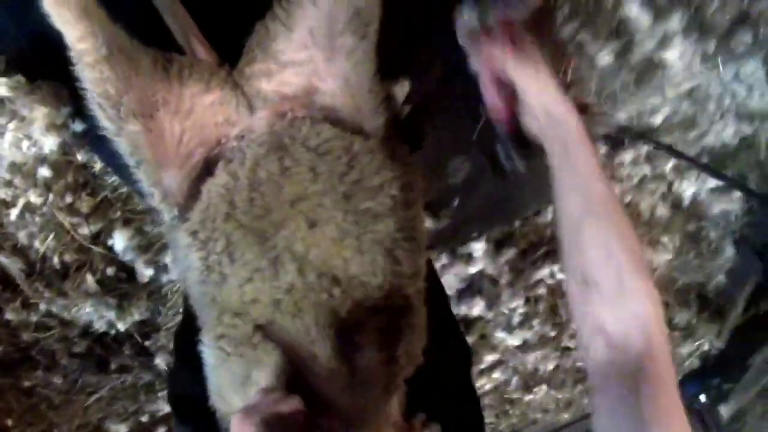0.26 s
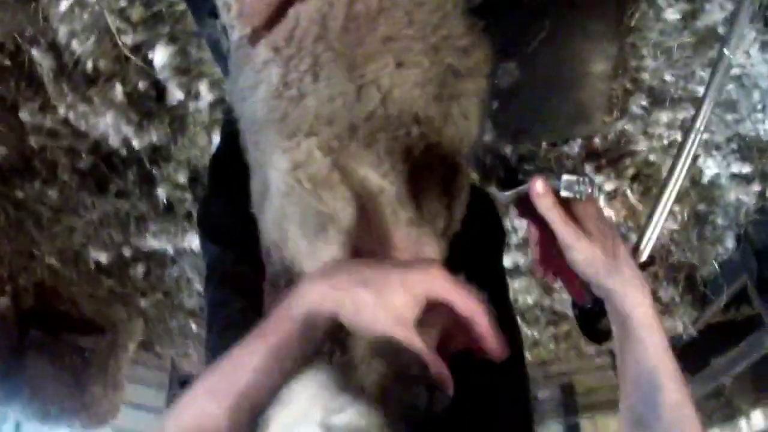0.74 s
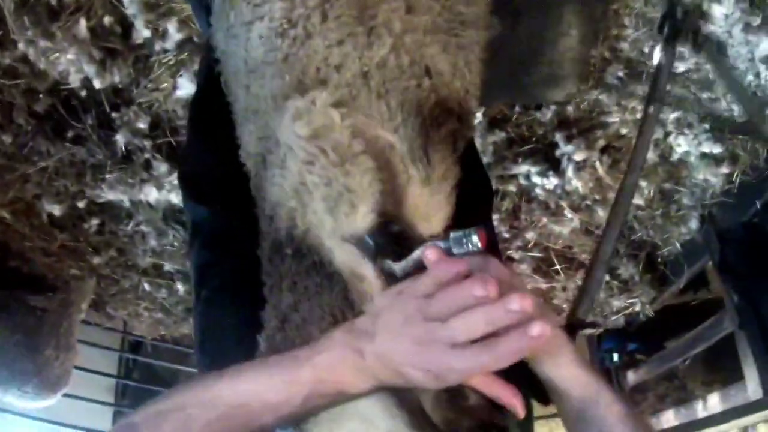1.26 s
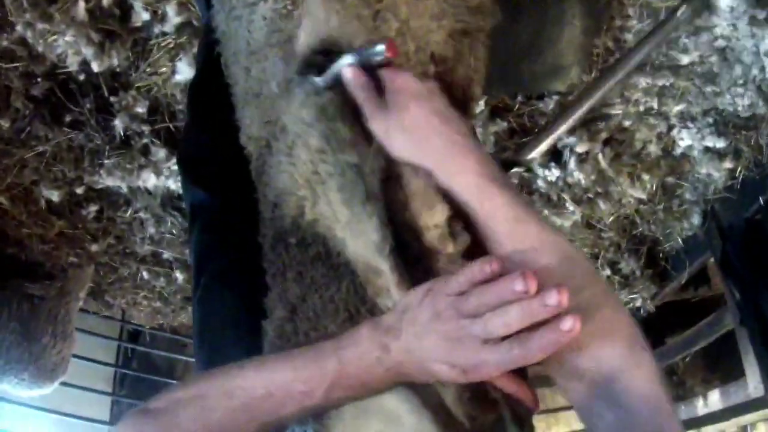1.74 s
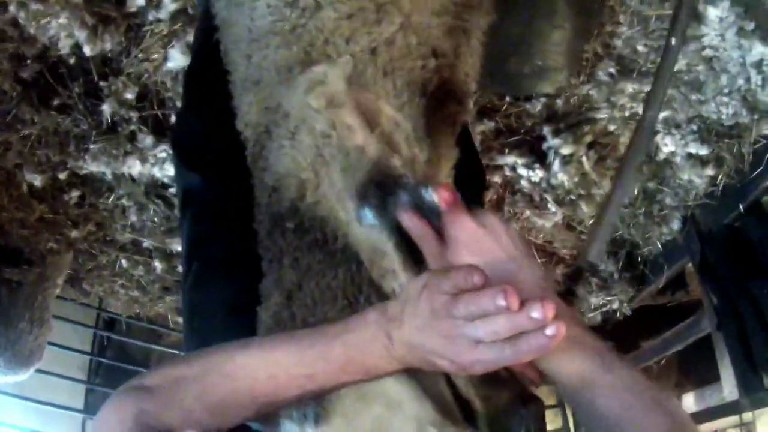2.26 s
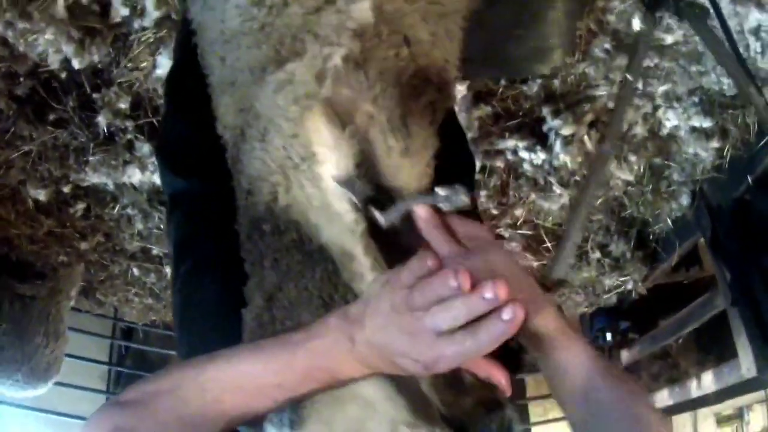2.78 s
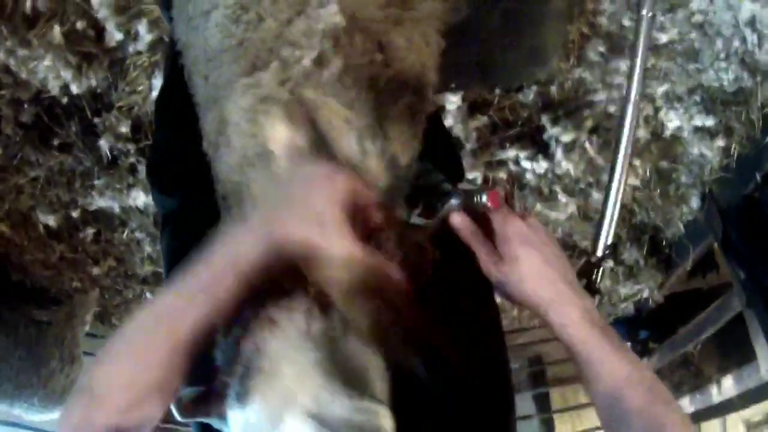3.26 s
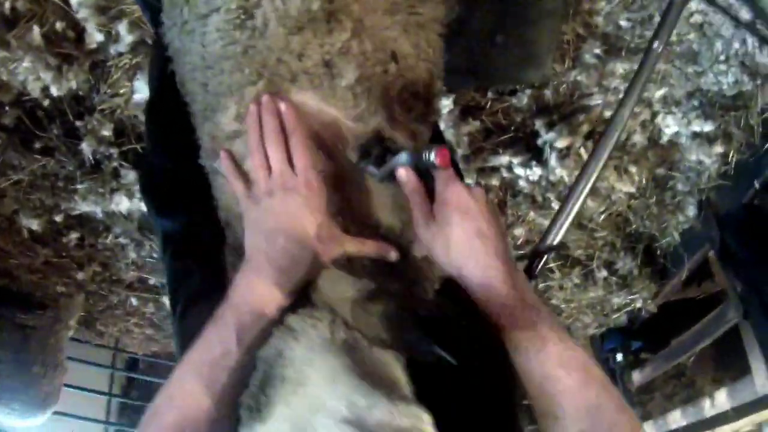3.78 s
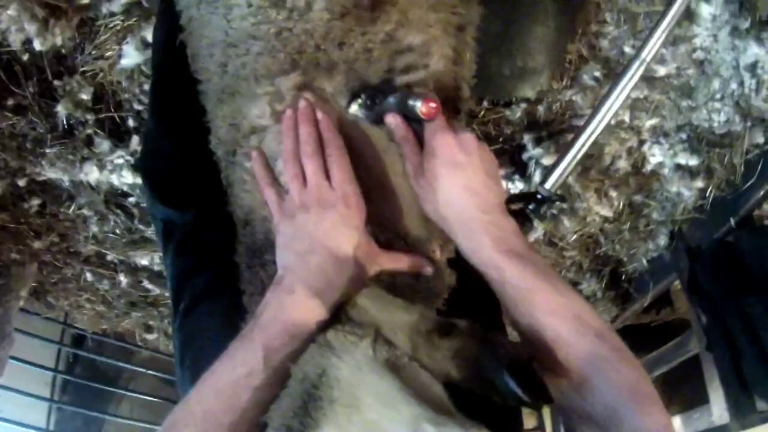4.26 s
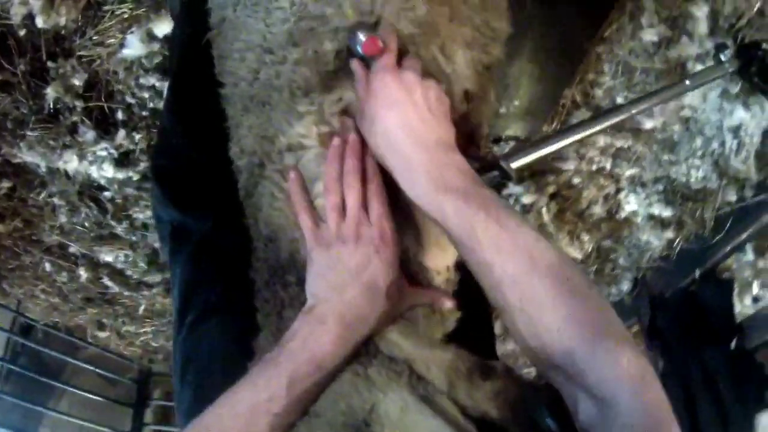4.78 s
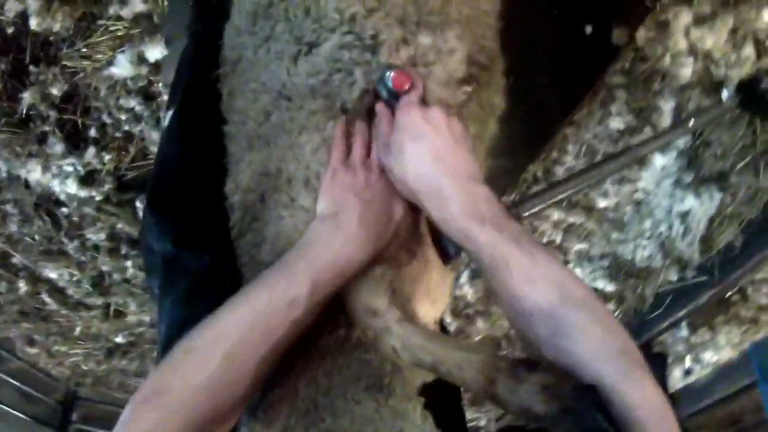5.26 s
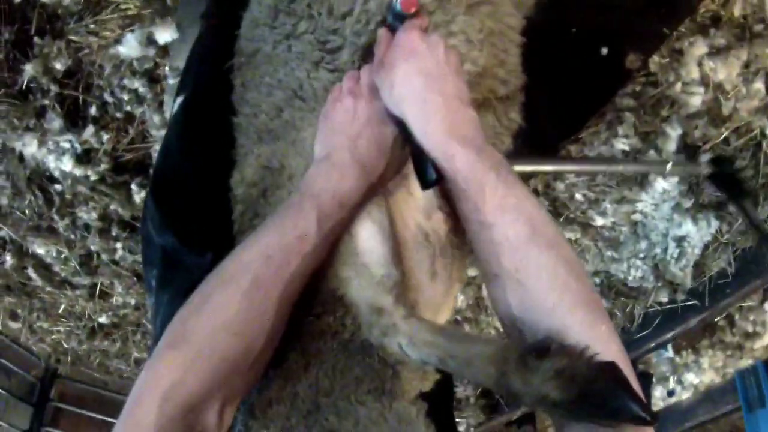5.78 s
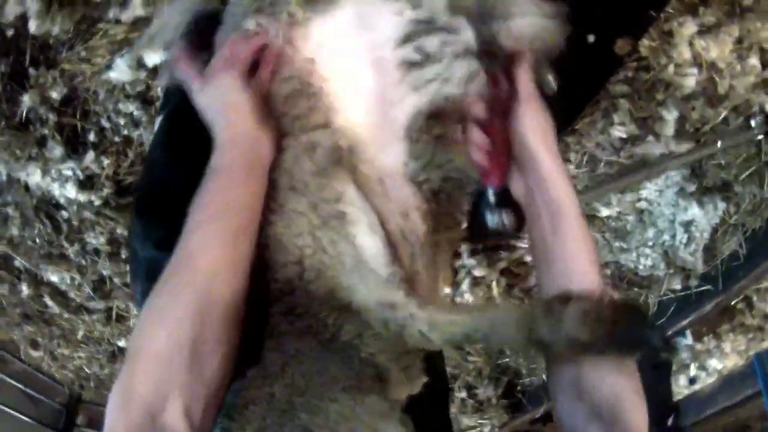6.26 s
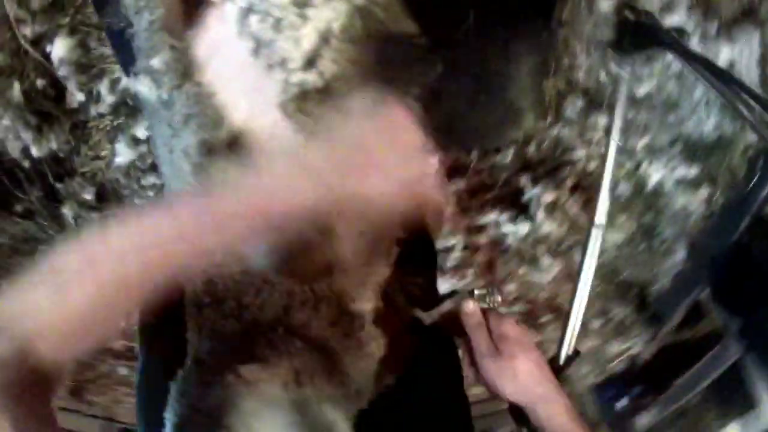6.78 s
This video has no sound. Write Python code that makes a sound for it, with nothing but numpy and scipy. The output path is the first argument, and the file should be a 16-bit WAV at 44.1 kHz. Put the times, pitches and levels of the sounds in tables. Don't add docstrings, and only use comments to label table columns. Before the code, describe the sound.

Close, steady metallic buzz of sheep-shearing clippers, ringing and scraping as the hand changes pressure, with a faint motor whine and soft microphone thuds.

```python
import sys
import numpy as np
from scipy import signal
from scipy.fft import rfft, irfft, next_fast_len
from scipy.io import wavfile
from scipy.ndimage import uniform_filter1d, map_coordinates

SR = 44100
rng = np.random.default_rng(int(sys.argv[2]) if len(sys.argv) > 2 else 0)


def wrap_up_sound(samples):
    columns = np.atleast_2d(samples).T
    tamed = np.clip(columns, -1, 1)
    steps = np.round(tamed * 32767).astype(np.int16)
    wavfile.write(sys.argv[1], SR, steps)


def gain_from_db(level_db):
    decades = np.asarray(level_db, float) / 20
    return 10 ** decades


N = 310023
T = np.arange(N) / SR


def evened(x):
    return x / np.sqrt(np.mean(x ** 2) + 1e-20)


def curves(rows):
    s, *columns = np.transpose(rows)
    return [np.interp(T, s, c) for c in columns]


def coloured(x, shape, lo_hz=0, hi_hz=SR, soft=0.058):
    size = next_fast_len(N)
    hz = np.fft.rfftfreq(size, 1 / SR) + 0.099
    f, db = np.transpose(shape)
    tint = gain_from_db(np.interp(np.log(hz), np.log(f), db))
    above_low = 1 + np.tanh((hz - lo_hz) / (soft * hz))
    below_high = 1 + np.tanh((hi_hz - hz) / (soft * hz))
    return evened(irfft(rfft(x, size) * tint * np.sqrt(above_low * below_high), size)[:N])


def wander(hz):
    noise = uniform_filter1d(rng.standard_normal(N), int(SR / hz / 4) + 1)
    return evened(signal.lfilter([1], [1, -np.exp(-2 * np.pi * hz / SR)], noise))


def held(start, length, swell_s=.13):
    to_edge = np.minimum(T - start, start + length - T)
    return np.sin(np.pi / 2 * np.clip(to_edge / swell_s, 0, 1)) ** 2


def resonate(x, hz, width):
    turn = np.exp(2j * np.pi * np.cumsum(hz * np.ones(len(x))) / SR)
    r = np.exp(-np.pi * width / SR)
    return evened((turn * signal.lfilter([1], [1, -2 * r, r * r], x / turn)).real)


def swing(turns, sharp, back_db, rest):
    bend = np.cos(2 * np.pi * turns)
    return rest + np.exp(sharp * (bend - 1)) + gain_from_db(back_db) * np.exp(-sharp * (bend + 1))


def knocks(turns, hold_s=.32, size=760):
    step = T / hold_s
    k = step.astype(int)
    part = np.sin(np.pi / 2 * (step % 1))
    patterns = rng.standard_normal((k.max() + 2, size))
    place = (turns % 1) * (size - 1)
    this = map_coordinates(patterns, [k, place], order=1)
    after = map_coordinates(patterns, [k + 1, place], order=1)
    return evened(np.sqrt(1 - part ** 2) * this + part * after)


def scrape(turns, sharp, back_db, rest, uneven_db):
    stroke = (2 * turns + .5).astype(int)
    hardness = uniform_filter1d(rng.standard_normal(stroke.max() + 1)[stroke], 40)
    effort = swing(turns, sharp, back_db, rest) * gain_from_db(uneven_db * hardness)
    return evened(effort * rng.standard_normal(N))


# time in seconds, turns a second.
SHAFT = [(0.0, 58.4), (0.2, 58.38), (0.4, 57.84), (1.0, 57.6), (1.6, 58.18), (1.9, 57.56), (2.2, 57.98),
         (2.6, 57.98), (2.8, 58.26), (3.2, 57.7), (3.6, 58.02), (4.1, 57.53), (4.8, 57.94), (5.2, 57.66),
         (5.8, 58.28), (6.4, 58.26), (6.65, 57.84), (7.03, 57.76)]


def handpiece():
    turns = np.cumsum(curves(SHAFT)[0] + .1 * wander(6)) / SR
    rattle = knocks(turns)
    knock = evened(rattle * swing(turns, 2.5, -2, .9))
    taps = evened(rattle * swing(turns, 6.0, -1.5, .4))
    ticks = scrape(turns, 11, -3, 4, .8)
    snaps = evened((rattle + .6 * ticks) * swing(turns, 5, -8, .4))
    rings = list(zip(*hand_on_rings(turns)))
    steel = head(turns, rattle, rings[:4]) + blades(turns, rattle, ticks, rings[4:])
    return steel + glints(0.08 * taps + snaps) + shaft_orders(turns) + tube_hum(knock)


# time in seconds, push into the wool, turn of the comb towards
HAND = [(0.0, -0.2, 0.34, -1), (0.24, 0, 1.1, -0.4), (0.72, 0.2, 0.61, 0), (1.08, -1.03, -0.14, -0.3),
        (1.76, 1, 0.059, -0.5), (2.24, -0.35, 0.58, -0.3), (2.44, -0.74, 0.3, -0.6), (2.9, 1.44, 0.34, -1),
        (3.2, -1.75, 1.75, 0.1), (3.8, 1.26, 0.63, -1.5), (4.32, 1.5, -1.4, -2), (4.68, 0, -1.6, 0.5),
        (4.96, 0.3, -0.64, -0.4), (5.52, 1, -1.5, -1.5), (5.84, 0, -0.5, 0.9), (6.16, -0.8, -0.064, -0.1),
        (6.72, 1, 1.5, -2.5), (7.03, 2, -0.3, -2.5)]
# usual level in dB, dB per push, dB per turn, dB per roll.
RINGS = [
    (-56, 0.74, -0.4, 1.06),
    (-51.5, 1.38, 1.4, 1.5),
    (-60, 1, 2, 1),
    (-57, 1.16, 0.64, 0.5),
    (-59, 1.5, 1.06, 0.37),
    (-58.5, 2, -0.3, 0.36),
    (-57, 0.5, 0.6, 0),
    (-63.5, 1, 0.85, 0.54),
]
RINGS_HZ = [1575, 2350, 3145, 3840, 4790, 5610, 6680, 10000]
# start in seconds, length in seconds, rise in Hz.
LOOSE = [(2.558, 0.58, 220), (3.493, .65, 172), (6.132, 1, 210)]
# lag in turns, sharpness (no unit), return stroke in dB,
# steady share (no unit).
STRIKES = [(.1, 5, -1, 1.8), (.03, 6, 0, 1.3), (-.03, 2.5, -20, 1.1), (0, 2.5, -20, 1.7), (0, 6, -3, 2.3),
           (.12, 7, -8, 2.4), (.07, 9, -16, 2), (.04, 16, -4, 1.3)]


def hand_on_rings(turns):
    push, turn, roll = curves(HAND)
    levels_db = [db + a * push + b * turn + c * roll + 0.5 * wander(2.6) for db, a, b, c in RINGS]
    rings_hz = [hz * (1 + 0.0095 * wander(7.2)) for hz in RINGS_HZ]
    rings_hz[1] = rings_hz[1] + sum(rise_hz * held(s, length) for s, length, rise_hz in LOOSE)
    drift_turns = .045
    strikes = [swing(turns - lag + drift_turns * wander(1.5), *shape) for lag, *shape in STRIKES]
    return levels_db, rings_hz, strikes


def ringing_band(knock, taps, rub, knock_share, ring, shape, lo_hz, hi_hz, bed):
    level_db, ring_hz, strike = ring
    bed_db, width_hz = bed
    drive = evened(strike * (np.sqrt(knock_share) * knock + np.sqrt(1 - knock_share) * rub))
    bed_level = np.minimum(gain_from_db(level_db), gain_from_db(bed_db))
    ring_level = np.sqrt(gain_from_db(level_db) ** 2 - bed_level ** 2)
    ringing = resonate(1.6 * drive + evened(strike * taps), ring_hz, width_hz)
    return bed_level * coloured(drive, shape, lo_hz, hi_hz, 0.011) + ring_level * ringing


# frequency in Hz, level in dB per Hz.
HEAD_SHAPE = [(740, -72), (1250, -18), (1320, -11.5), (1450, -2), (1500, 0), (1670, -4), (1820, -9),
              (2070, 0), (2350, 1), (2900, -4.5), (3140, 0.5), (3390, -6), (3660, 1), (4040, -7),
              (4300, -6.5), (5590, -20), (9460, -120)]
HEAD_EDGES_HZ = [1000, 1850, 2930, 3420, 4350]
# level of the wide bed in dB, width of the ring in Hz.
HEAD_BEDS = [(-57, 500), (-53, 670), (-61, 450), (-58, 2100)]


def head(turns, rattle, rings):
    strokes = scrape(turns, 4, -1, 3, .3)
    taps = 0.71 * rattle + 0.67 * strokes
    out = np.zeros(N)
    for i, knock_share in enumerate([0.28, 0.25, 0.21, 0.18]):
        rub = scrape(turns + 0.13 * rng.standard_normal(), 0.64, 0.0, 4, 0.34)
        out += ringing_band(rattle, taps, rub, knock_share, rings[i], HEAD_SHAPE,
                            HEAD_EDGES_HZ[i], HEAD_EDGES_HZ[i + 1], HEAD_BEDS[i])
    return out


# frequency in Hz, level in dB per Hz.
BLADE_SHAPE = [(2530, -39), (4300, -10.5), (4790, -8.5), (5160, -7.5), (5450, 1.5), (5800, -0.5),
               (6230, -8), (6820, -4), (7400, -8), (7850, -5.5), (8300, -15), (8870, -15.5), (11400, -19.5),
               (12300, -22.5), (15800, -26)]
BLADE_EDGES_HZ = [4350, 5170, 6150, 8350, 17000]
# level of the wide bed in dB, width of the ring in Hz.
BLADE_BEDS = [(-59, 940), (-58, 1040), (-57, 2700), (-58, 3000)]


def blades(turns, rattle, ticks, rings):
    hiss = scrape(turns + .07 * wander(30), 3.0, -5, 5, 1.4)
    out = np.zeros(N)
    for i, knock_share in enumerate([0.15, 0.17, 0.24, 0.37]):
        out += ringing_band(rattle, ticks, hiss, knock_share, rings[i], BLADE_SHAPE,
                            BLADE_EDGES_HZ[i], BLADE_EDGES_HZ[i + 1], BLADE_BEDS[i])
    return out


# start in seconds, length in seconds, pitch in Hz, level in dB.
GLINTS = [(0.13, 0.15, 2350, -48), (0.42, 0.11, 2380, -51), (0.072, 0.47, 6900, -57.5),
          (0.52, 0.36, 3160, -52.5), (0.57, 0.25, 3540, -54), (.56, .3, 3750, -59), (.55, 0.36, 6100, -64),
          (1.15, 0.37, 3580, -60), (1.66, 0.36, 1650, -63), (2.85, 0.3, 4900, -57),
          (3.02, 0.3, 4820, -56.5), (5.95, .35, 1560, -57), (2.84, .3, 3050, -58), (4.1, .7, 9500, -76),
          (4.1, .7, 13500, -81), (5.25, .42, 5600, -65), (5.7, 0.34, 4800, -61), (1.42, 0.19, 4800, -61),
          (2.4, .2, 5350, -59), (0.6, .2, 3900, -59), (.58, 0.22, 4900, -60), (3.2, 0.34, 2840, -55.5),
          (3.5, 0.27, 7600, -61), (4.05, 0.31, 3500, -58), (4.2, .25, 3280, -56), (4.33, 0.27, 3060, -58),
          (3.516, 0.48, 2390, -55), (4.1, 0.57, 5800, -66), (4.45, 0.46, 5500, -62), (5.4, 0.17, 7540, -62),
          (5.1, .35, 6790, -66), (6.2, 0.29, 6540, -63), (1.4, .5, 7770, -70), (2.75, 0.44, 7900, -63),
          (5.3, 0.64, 4750, -71), (4.423, .16, 1591, -50), (.58, .25, 4400, -58), (.8, 0.27, 5700, -72),
          (1.45, .4, 6700, -65), (2.8, 0.41, 2240, -60), (3.603, .4, 6600, -63), (5.4, 0.18, 3000, -57),
          (6.7, 0.4, 8200, -66), (.6, 0.19, 2600, -55), (2, 0.42, 6000, -68), (1.95, .3, 3330, -61),
          (6.2, 0.19, 2340, -60), (6.618, 0.18, 2400, -52.5), (0.846, 0.2, 2280, -52.5),
          (4.854, 0.31, 2300, -52.5), (4.95, 0.37, 3300, -63), (5.2, 0.46, 5100, -64),
          (5.8, 0.15, 7670, -56.5), (6.5, 0.26, 1470, -59)]


def glints(taps):
    longest_swell_s, width_share = 0.16, 0.085
    out = np.zeros(N)
    for s, length, hz, db in GLINTS:
        span = slice(max(round(s * SR), 0), round((s + length) * SR))
        swell = held(s, length, min(length / 2, longest_swell_s))[span]
        out[span] += gain_from_db(db) * swell * resonate(taps[span], hz, width_share * hz)
    return out


# start in seconds, length in seconds, order, dB above rest.
SINGS = [(0.46, 0.58, 1, 7.5), (2.18, 0.61, 1, 5.5), (3.103, 0.47, 1, 10.5), (4.6, 0.32, 1, 6),
         (1.46, 0.27, 1, 9), (5.95, 0.35, 1, 4), (1.16, 1.05, 12, 6.5), (3, 0.76, 12, 5),
         (4.02, 0.74, 12, 12), (4.7, 0.91, 12, 9), (5.784, 0.57, 12, 12), (3.55, 0.46, 14, 13.5),
         (3.93, 0.28, 14, 14), (4.12, .33, 14, 13), (4.4, .36, 14, 10), (3.75, 0.37, 13, 11),
         (4.55, .5, 13, 6), (3.95, .6, 17, 8), (0.087, .45, 13, 6), (4.4, 0.27, 14, 5), (6.1, 0.35, 14, 8),
         (0.14, 0.68, 26, 8.5), (0.96, 1.33, 26, 9.5), (2.7, 0.26, 26, 9), (3.7, 0.38, 26, 8),
         (4.65, 1.18, 26, 12.5), (6.353, 0.42, 26, 9), (4.05, 0.52, 19, 13), (4.85, 0.74, 19, 13),
         (2.55, 0.47, 24, 13), (3.9, 1.04, 24, 10), (5.1, 0.77, 24, 11), (1.12, 0.87, 25, 6),
         (3.62, 0.36, 25, 12), (3.95, 0.34, 25, 12), (4.65, 0.4, 25, 9), (5.1, 0.52, 25, 12),
         (4.4, 1.8, 27, 12), (0.58, 1.53, 28, 6.5), (4.28, 0.29, 28, 12), (4.6, .6, 28, 6),
         (5.55, 0.33, 28, 9), (1.3, 0.57, 29, 10.5), (5, 0.6, 29, 12), (6.5, .3, 29, 10),
         (0.41, 0.21, 37, 6), (1.13, 1.5, 37, 9), (2.8, .75, 37, 10), (3.95, 1.76, 37, 8), (.2, 2, 39, 0.5),
         (2.8, .8, 39, 7), (3.8, 0.99, 39, 3), (0.13, 1.3, 41, -1), (3.8, .6, 41, 5), (4.95, 0.91, 41, 9),
         (6.55, 0.5, 41, 12.5), (0.14, 0.51, 42, 7), (1.3, 0.63, 42, 9.5), (2.4, 0.65, 42, 14),
         (3.35, 0.61, 42, 11), (2.4, .6, 43, 9), (3.55, 0.64, 43, 18.5), (5, 1.4, 43, 6),
         (6.2, 0.45, 43, 4), (1.6, 0.36, 46, 14), (2.56, 0.46, 46, 11), (3.66, 0.47, 46, 18),
         (6.35, 0.78, 46, 14.5)]


def sung(k):
    lifts = [up_db * held(s, length) for s, length, order, up_db in SINGS if order == k]
    return np.max([0 * T] + lifts, axis=0)


# order, level in dB.
ORDERS = [(1, -70.5), (12, -76), (14, -81), (26, -68), (19, -89), (24, -74), (25, -70), (27, -77),
          (28, -67.5), (29, -70), (37, -68.5), (39, -67), (41, -70), (42, -69), (43, -74), (46, -76)]
# order, dB relative to it.
SIDE_ORDERS = [(11, -13), (13, -6), (15, -12.5), (16, -13), (17, -10), (20, -21), (21, -12)]


def shaft_orders(turns):
    levels = [(k, db + sung(k)) for k, db in ORDERS]
    order_12_db = levels[1][1]
    for k, db in SIDE_ORDERS:
        levels.append((k, 0.59 * order_12_db - 34.5 + db + 2.8 * wander(1.2) + sung(k)))
    flutter_db, slack, lock_turns = 1.8, .003, .3
    out = np.zeros(N)
    for k, db in levels:
        phase = k * turns + lock_turns * rng.random() + slack * k * wander(5.1)
        out += np.sqrt(2) * gain_from_db(db + flutter_db * wander(8.3)) * np.cos(2 * np.pi * phase)
    return out


# frequency in Hz, level in dB per Hz.
HUM_SHAPE = [(65, -34), (110, -3), (492, -9.5), (599, -8.5), (685, -5), (869, -7.5), (1000, -5), (1090, -9),
             (1300, -1.5), (1690, -22), (2860, -120)]


def tube_hum(knock):
    low_knock = signal.lfilter(*signal.butter(2, 550, "high", fs=SR), knock)
    hum = 0.38 * low_knock + rng.standard_normal(N)
    return gain_from_db(-66.5) * coloured(hum, HUM_SHAPE, 81, 1202)


def motor():
    whine_hz, level_db, fade_db_per_s = 1023, -71.5, -0.5
    level = gain_from_db(level_db + fade_db_per_s * T + 0.4 * wander(7.5))
    phase = np.cumsum(whine_hz + 0.95 * wander(4.9)) / SR
    return np.sqrt(2) * level * np.sin(2 * np.pi * phase)


# frequency in Hz, level in dB per Hz.
RUMBLE_SHAPE = [(2.4, -30), (4.0, -2), (16, 3.5), (24, -4), (43, -23.5), (66, -21.5), (102, -30.5),
                (280, -53.5), (360, -67), (620, -120)]
# time in seconds, sway level in dB.
SWAY = [(0.0, -52.5), (0.08, -34.5), (0.33, -31), (0.51, -45), (1.02, -53.5), (1.15, -44), (1.92, -52.5),
        (2.0, -41), (2.29, -58), (2.64, -43.5), (4.13, -53), (4.21, -62.5), (4.7, -44.5), (4.76, -54),
        (5.74, -45.5), (5.8, -57.5), (6.99, -44.5), (7.03, -42)]
# time in seconds, jolt level in dB.
JOLTS = [(0.0, -59), (0.08, -53), (0.12, -55), (0.23, -52), (0.49, -62), (1.57, -61), (2.08, -59),
         (2.17, -64), (3.35, -59), (3.74, -70), (3.8, -63.5), (4.95, -64), (5.23, -56), (5.31, -64),
         (5.78, -59), (6.05, -73), (6.23, -61.5), (7.03, -57)]


def rumble():
    sway_db = curves(SWAY)[0]
    thud_db = curves(JOLTS)[0] + 1.64
    push = rng.standard_normal(N)
    sway = evened(np.tanh(.8 * coloured(push, RUMBLE_SHAPE, 4.3, 16.4, 0.043)))
    thud = coloured(push, RUMBLE_SHAPE, 26.4, 350, 0.18)
    scuff = coloured(rng.standard_normal(N), HUM_SHAPE, 80, 314, 0.054)
    scuff_db = -61.5 + 1.47 * (thud_db + 47)
    return gain_from_db(sway_db) * sway + gain_from_db(thud_db) * thud + gain_from_db(scuff_db) * scuff


def scene():
    return (handpiece() + motor() + rumble())[None]


# middle in seconds, length in seconds, percent of tones lost.
DROPOUT = (6.827, .024, 84)


def dropout(dry):
    s, length, weakest = DROPOUT
    start, size = round((s - length / 2) * SR), round(length * SR)
    frame = rfft(dry[0, start:start + size] * np.sqrt(np.hanning(size)))
    standout = abs(frame) / uniform_filter1d(abs(frame), 30)
    weak = standout < np.percentile(standout, weakest)
    weak &= np.arange(len(frame)) > 12
    out = dry.copy()
    out[0, start:start + size] -= irfft(frame * weak, size)
    return out


def low_pass(x):
    return signal.sosfilt(signal.butter(12, 15740, fs=SR, output="sos"), x)


def record(dry):
    mix = dropout(dry)
    return low_pass(mix)


dry = scene()
out = record(dry)
wrap_up_sound(out)
```